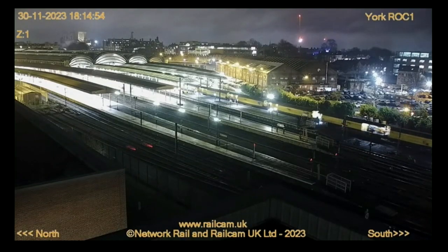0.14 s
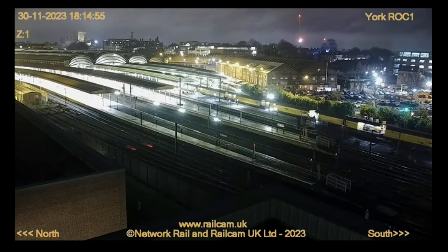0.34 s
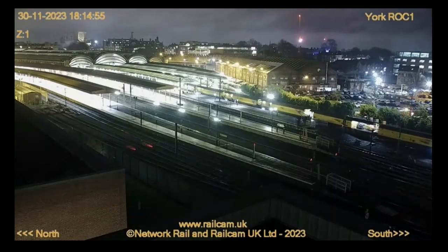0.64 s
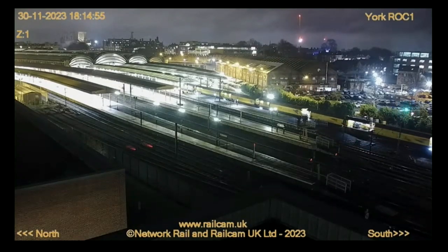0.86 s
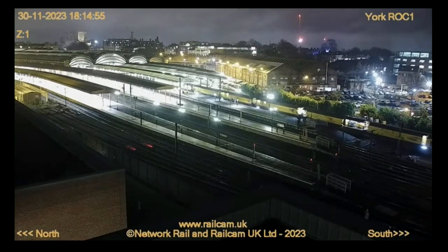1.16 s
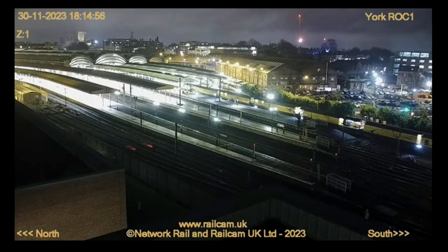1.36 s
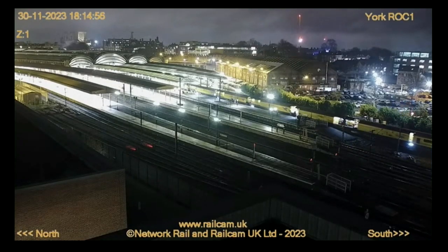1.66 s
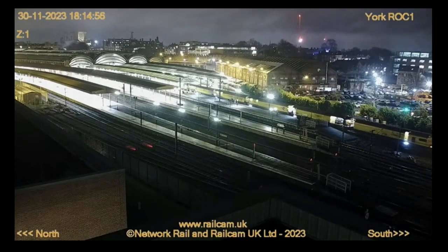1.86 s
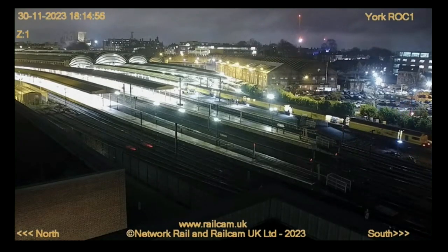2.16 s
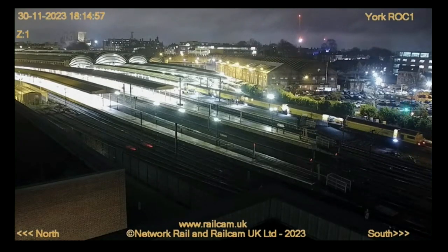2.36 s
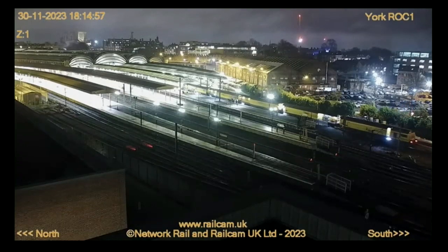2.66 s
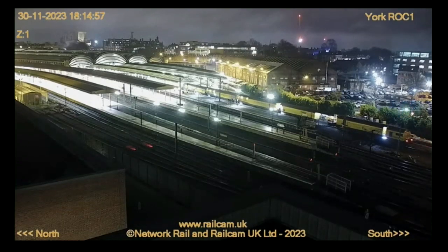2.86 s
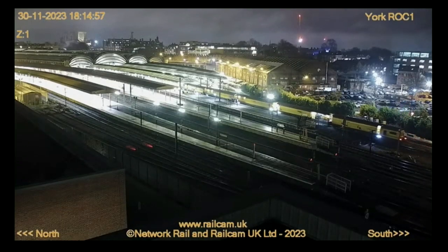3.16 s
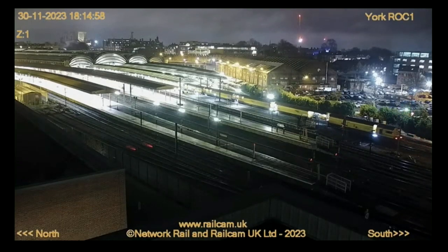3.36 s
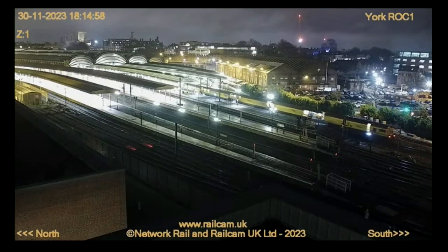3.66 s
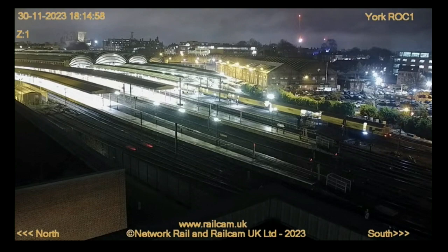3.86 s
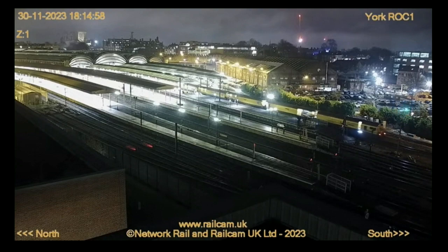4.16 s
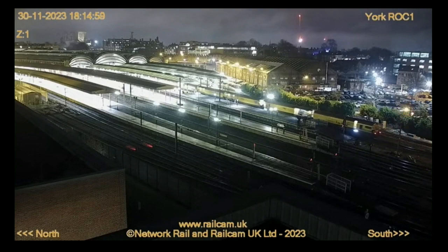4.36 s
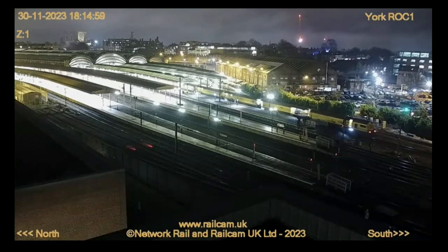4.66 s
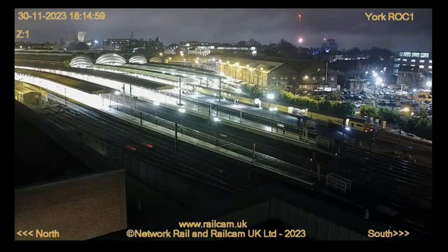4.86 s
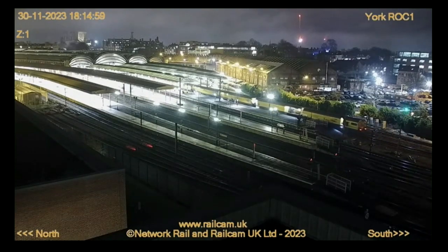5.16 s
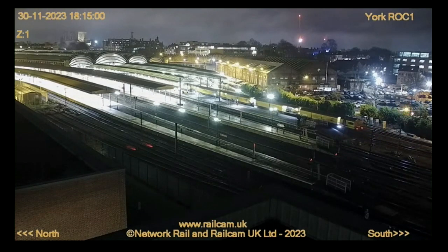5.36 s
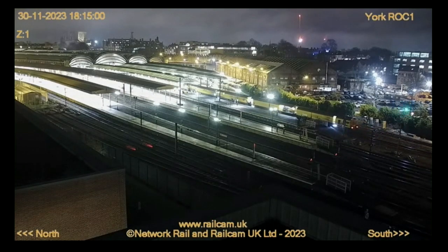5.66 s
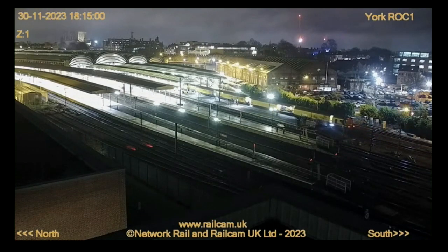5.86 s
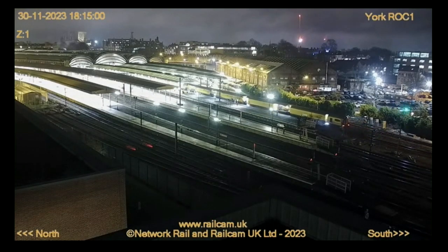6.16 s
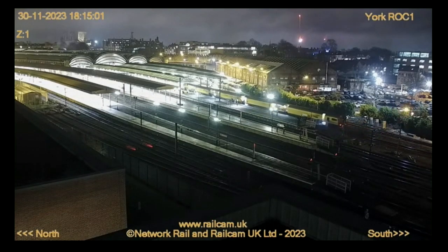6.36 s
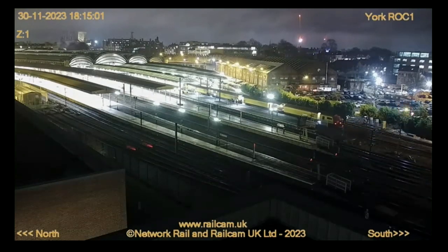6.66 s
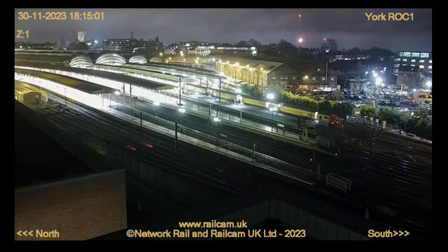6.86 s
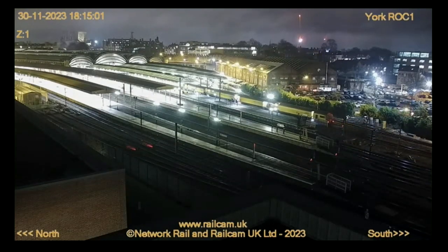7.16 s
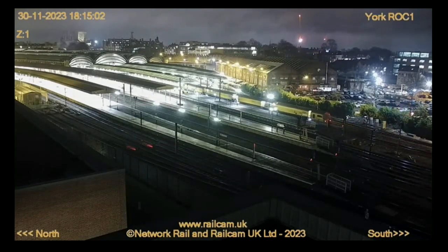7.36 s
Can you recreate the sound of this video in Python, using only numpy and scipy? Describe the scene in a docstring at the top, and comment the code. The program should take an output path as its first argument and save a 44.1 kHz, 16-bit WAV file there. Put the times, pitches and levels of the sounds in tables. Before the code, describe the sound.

Continuous distant diesel noise from a train crawling across an open yard: midrange roar, rough hum from two engines and a breathy, uneven hiss. A mid-pitched gear whine comes and goes, and a higher fan tone grows clearer later. There is one momentary silent gap early, a faint gentle air puff in the middle, then a short crisp one with a brief yard echo. The enclosed outdoor microphone gives a hollow, band-limited colour.

```python
"""A station at night: a diesel work train crawls through, heard from a roof by a microphone in a weather housing.
Coloured noise makes a broad roar and a lumpy hiss, and two air valves puff as short bursts of sputtering noise.
Wavering sines make the whine of gears, fan and alternator, and the exhaust notes of two engines.
The housing's cavities colour the upper roar, hiss and puffs; the feed drops out once for a moment."""
import sys
import numpy as np
from scipy import signal
from scipy.fft import rfft, irfft, next_fast_len
from scipy.io import wavfile
from scipy.ndimage import uniform_filter1d

SR = 44100
rng = np.random.default_rng(int(sys.argv[2]) if len(sys.argv) > 2 else 0)


def wrap_up_sound(samples):
    """Save the sound to the file named by the first command line argument, as 16-bit audio."""
    columns = np.atleast_2d(samples).T
    # keep every value between -1 and 1, then stretch to whole-number steps
    tamed = np.clip(columns, -1, 1)
    steps = np.round(tamed * 32767).astype(np.int16)
    wavfile.write(sys.argv[1], SR, steps)


N = 331191
T = np.arange(N) / SR  # time in seconds
M = next_fast_len(N)
F = np.maximum(np.arange(M // 2 + 1) * SR / M, 1)  # spectrum frequencies in Hz, kept above zero for the logs

# Tone colour of the roar. Each row: frequency in Hz, relative level in dB.
ROAR_COLOUR = [(20, -36.5), (35, -19.5), (60, -25.5), (100, -17.5), (170, -14), (400, -10), (620, -8.5),
               (830, -7.5), (930, -5), (1010, -3), (1070, -5.5), (1130, -15.5), (1500, -24.5),
               (1600, -34.5), (1750, -41)]
# Tone colour of the hiss. Each row: frequency in Hz, relative level in dB.
HISS_COLOUR = [(1030, -49), (1750, -10), (2060, -2.5), (2520, 1.5), (2830, -5), (3080, -8), (3260, -9),
               (3320, -8.5), (3520, -7.5), (3950, -6.5), (4150, 3), (4280, 4), (4520, -.5), (5160, -19.5),
               (6320, -16), (7020, -27), (9130, -66.5), (15400, -120)]
# Small cavities of the housing. Each row: centre in Hz, width in Hz, boost or cut in dB.
HOUSING_CAVITIES = [(1643, 61, 5.5), (1770, 110, -9), (3124, 93, 7), (5160, 180, -1.5), (5670, 150, 9),
                    (6250, 120, 9)]
# Slow swells of the noise. Each row: time in seconds, change of the roar in dB, change of the hiss in dB.
NOISE_SWELLS = [(0.0, 1, 0.5), (1.1, -.5, 0), (1.5, 0.1, -0.5), (1.9, -1.5, 0.8), (2.25, 1, 2),
                (2.65, -1.5, -0.9), (3.4, .5, 0), (4.4, -0.5, -1.5), (5.05, 0, 1), (5.65, 0, -1.5),
                (6.2, 1.5, 1.2), (6.85, -.5, -1.5), (7.5, 0, 2)]
# Air valve puffs. Each row: start in seconds, rise in seconds, hold in seconds, time to fall 60 dB in seconds,
# jet level before echo and sputter in dB, jet pitch in Hz, jet width in Hz, sputter depth in dB.
AIR_PUFFS = [(3.42, .2, .06, .25, -35.5, 5000, 4500, 1.2), (5.971, .003, .04, .08, -25.6, 6300, 5600, 1.3)]
# Ringing of the valves. Each row: centre in Hz, width in Hz, boost in dB.
VALVE_RINGING = [(2530, 350, 4.3), (4300, 450, 3.5)]
# Gear whine. Each row: time in seconds, level in dB.
GEAR_LEVELS = [(0.0, -38), (.2, -33), (.42, -31.5), (.78, -32), (.95, -40), (1.12, -39), (1.24, -30),
               (1.5, -36), (1.95, -39), (2.2, -33), (2.42, -28), (2.62, -29.5), (2.87, -27.5), (3.0, -37),
               (3.19, -28.5), (3.4, -40), (3.52, -30.5), (3.68, -31.5), (3.9, -26.5), (4.12, -29.5),
               (4.25, -39), (4.75, -32.5), (4.95, -44), (5.1, -42), (5.24, -33.5), (5.5, -38), (5.9, -36),
               (6.05, -42), (6.44, -31), (6.68, -42), (6.9, -33), (7.25, -37), (7.5, -35.5)]
# Fan whine. Each row: time in seconds, level in dB.
FAN_LEVELS = [(0.0, -43), (0.5, -38.5), (1.1, -45), (2.1, -41), (2.7, -45), (2.95, -37.5), (3.3, -39),
              (3.65, -33.5), (4.05, -32.5), (4.15, -37), (4.3, -34), (4.85, -32), (5.2, -33.5), (5.9, -34),
              (6.3, -39), (6.65, -43), (6.95, -31), (7.5, -32)]
# Far engine exhaust. Each row: time in seconds, then levels in dB of the firing rate, its double and its triple.
FAR_LINES = [(0, -45, -53, -45), (.8, -49, -51, -44), (1.15, -44, -47, -44), (1.7, -48, -49, -45),
             (2.1, -45, -45, -45), (2.6, -49, -53, -46), (3.2, -43.5, -47, -45), (4.1, -50, -50, -47),
             (4.6, -47, -48, -43), (5.2, -49, -54, -46), (5.85, -45, -43.5, -41.5), (6.3, -47, -50, -42),
             (7.0, -43, -53, -46), (7.5, -47, -53, -48)]
# Fourth multiple of the far firing rate, strong early on. Each row: time in seconds, level in dB.
FAR_FOURTH_LINE = [(0, -42), (.6, -43), (.9, -36), (1.9, -41.5), (2.2, -54), (7.5, -55)]
# Side lines of the near engine. Each row: multiple of the cycle rate, level relative to the drone in dB.
NEAR_SIDE_LINES = [(8, -13.5), (12, -7.5), (14, -11)]

# noise layers, before swells and clatter: (level at the start in dB, steady change in dB per second)
LOW_ROAR, UPPER_ROAR, RADIATOR, LEAKS = (-33.5, -0.21), (-24.5, 0.0082), (-39, -0.23), (-38, -0.73)
ECHO_DB, ECHO_T60_S = -7.5, .35  # the yard's answer to each puff, and its time to fall 60 dB
NEAR_CYCLE_HZ, FAR_FIRING_HZ, GEAR_HZ, FAN_HZ, ALTERNATOR_HZ = 14.8, 143.3, 467.2, 387.5, 3003
# the near drone starts HIDDEN_DB lower and closes that gap at the pace of EMERGE_S
DRONE_DB, HIDDEN_DB, EMERGE_S = -42.5, -21, .6
DROPOUT_S, FADE_S = (1.4565, 1.4822), .0025  # silence from and until; the fade ends as the silence starts
TOP_HZ = 7220


def undb(db):
    """Turn decibels into a plain factor."""
    return 10 ** (np.asarray(db) / 20)


def level(x, db):
    """Scale a sound so that its average (rms) level is db."""
    return x * undb(db) / np.sqrt(np.mean(x ** 2))


def columns(rows):
    """Join the rows of a table with straight lines; return each column sample by sample, without the time."""
    seconds, *values = np.transpose(rows)
    return [np.interp(T, seconds, value) for value in values]


def walk(rate):
    """A random wandering curve: values held for 1 / rate seconds, smoothed twice, with a spread near 1."""
    hold = int(SR / rate)
    steps = np.repeat(rng.standard_normal(N // hold + 1), hold)
    smooth = uniform_filter1d(uniform_filter1d(steps, hold), hold)
    return 1.262 * smooth[:N]  # smoothing shrinks the spread


def colour(x, shape, cavities=()):
    """Filter a white sound to the shape, falling 60 dB per octave beyond its ends, with peaks for the cavities."""
    hz, db = np.transpose(shape)
    gain_db = np.interp(np.log(F), np.log(hz), db)
    octaves_below = np.maximum(np.log2(hz[0] / F), 0)
    octaves_above = np.maximum(np.log2(F / hz[-1]), 0)
    gain_db -= 60 * (octaves_below + octaves_above)
    for centre_hz, width_hz, top_db in cavities:
        gain_db += top_db / (1 + (2 * (F - centre_hz) / width_hz) ** 2)
    return irfft(rfft(x, M) * undb(gain_db), M)[:N]


def restless(edges, shape, curve_db, flicker_db, rate, cavities=()):
    """Coloured noise at a moving level; each band between the edges (Hz) flickers on its own."""
    spectrum = rfft(rng.standard_normal(M))
    out = 0
    for low_hz, high_hz in zip(edges, edges[1:]):
        in_band = (F >= low_hz) & (F < high_hz)
        band = irfft(spectrum * in_band, M)[:N]
        out = out + band * undb(flicker_db * walk(rate))
    return level(colour(out, shape, cavities), 0) * undb(curve_db)


def tone(hz, db, drift, waver_db):
    """A rotating part: a sine whose speed drifts; echoes off the yard make its level waver around db (rms)."""
    speed_hz = hz * (1 + drift * walk(3))
    phase = 2 * np.pi * (np.cumsum(speed_hz) / SR + rng.random())
    return np.sqrt(2) * undb(db + waver_db * walk(5.5)) * np.sin(phase)


def roar(low_db, upper_db, clatter):
    """Exhaust, intake and wheels as broad noise; the upper part throbs slightly with the engine cycle."""
    throb_db = .7 * np.sin(2 * np.pi * NEAR_CYCLE_HZ * T)
    low_edges = [10, 110, 220, 320, 450]
    upper_edges = [450, 620, 850, 1000, 1150, 1270, 1400, 1550, 1700, 2600]
    low = restless(low_edges, ROAR_COLOUR, low_db + 1.0 * clatter, 0.99, 12)
    upper_db = upper_db + .8 * clatter + throb_db
    return low + restless(upper_edges, ROAR_COLOUR, upper_db, 1.54, 45, HOUSING_CAVITIES)


def hiss(radiator_db, leak_db, clatter):
    """Radiator air and leaks: rushing noise, lumpy in narrow bands, through the housing's cavities."""
    radiator_edges = np.geomspace(1500, 3300, 11)
    leak_edges = np.geomspace(3300, 7400, 13)
    radiator_db = radiator_db + .9 * clatter + 0.15 * walk(20)
    leak_db = leak_db + 0.42 * clatter
    radiator = restless(radiator_edges, HISS_COLOUR, radiator_db, 2.17, 40, HOUSING_CAVITIES)
    return radiator + restless(leak_edges, HISS_COLOUR, leak_db, 2.22, 30, HOUSING_CAVITIES)


def valves():
    """Each puff is a sputtering jet of air, brighter than the steady hiss, in the same housing."""
    out = 0
    for start, rise, hold, t60, db, jet_hz, width_hz, sputter_db in AIR_PUFFS:
        peaks = [*HOUSING_CAVITIES, *VALVE_RINGING, (jet_hz, width_hz, 18)]
        jet = level(colour(rng.standard_normal(N), HISS_COLOUR, peaks), db)
        opening = np.clip((T - start) / rise, 0, 1)
        since_shut = np.maximum(T - start - rise - hold, 0)
        release = undb(-60 * since_shut / t60)
        echo = undb(ECHO_DB - 60 * since_shut / ECHO_T60_S)
        tail = np.hypot(release, echo)  # adds their powers
        out = out + jet * opening * tail * undb(sputter_db * walk(150))
    return out


def whines(gear_db, fan_db):
    """Meshing gear teeth with their octave, two multiples of the fan rate and a thin alternator line, as sines."""
    gear = tone(GEAR_HZ, gear_db + 1.6 * walk(18), .003, .4)
    gear += tone(2 * GEAR_HZ, gear_db - 16.0, .0015, 2.2)
    fan = tone(2 * FAN_HZ, fan_db, .0005, .8)
    fan += tone(3 * FAN_HZ, -50, .0015, 3)
    return gear + fan + tone(ALTERNATOR_HZ, -61.5, .0003, 2.4)


def engines(drone_db):
    """Exhaust pulses heard as sines at multiples of a rate: a steady six-cylinder and a rougher, faster engine."""
    near = tone(6 * NEAR_CYCLE_HZ, drone_db, .0004, .5)  # six firings per cycle
    for multiple, relative_db in NEAR_SIDE_LINES:
        near += tone(multiple * NEAR_CYCLE_HZ, drone_db + relative_db, .006, 2.8)
    far = tone(4 * FAR_FIRING_HZ, columns(FAR_FOURTH_LINE)[0], .002, 1.8)
    for multiple, line_db in enumerate(columns(FAR_LINES), 1):
        far += tone(multiple * FAR_FIRING_HZ, line_db, .003, 1.2)
    return near + far


def scene():
    """Set the moving levels and add up all the sources."""
    roar_swell, hiss_swell = columns(NOISE_SWELLS)
    low_db, upper_db = (db + slope * T + roar_swell for db, slope in (LOW_ROAR, UPPER_ROAR))
    radiator_db, leak_db = (db + slope * T + hiss_swell for db, slope in (RADIATOR, LEAKS))
    clatter = walk(45)  # uneven firing flutters through the roar and hiss at once
    noise = roar(low_db, upper_db, clatter) + hiss(radiator_db, leak_db, clatter) + valves()
    gear_db, fan_db = columns(GEAR_LEVELS)[0], columns(FAN_LEVELS)[0]
    drone_db = DRONE_DB + HIDDEN_DB * np.exp(-T / EMERGE_S)  # grows in, then holds
    return (noise + whines(gear_db, fan_db) + engines(drone_db))[None]


def record(dry):
    """The feed fades fast, stays silent briefly and snaps back; input coupling thins the bass, then the top is cut."""
    fade = np.clip((DROPOUT_S[0] - T) / FADE_S, 0, 1) ** 2
    live = np.where(T > DROPOUT_S[1], 1, fade)
    coupling = signal.butter(1, 60, "high", fs=SR, output="sos")
    coupled = signal.sosfilt(coupling, dry * live)  # settles after the dropout
    top_cut = signal.ellip(10, .5, 55, TOP_HZ, fs=SR, output="sos")
    return signal.sosfilt(top_cut, coupled)


dry = scene()
out = record(dry)
wrap_up_sound(out)
```